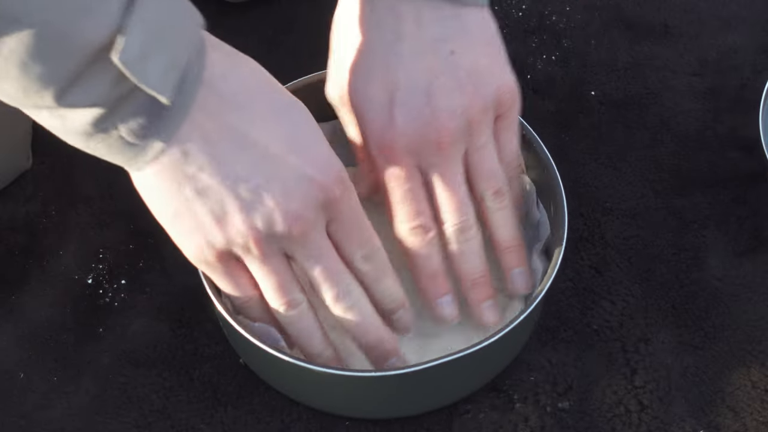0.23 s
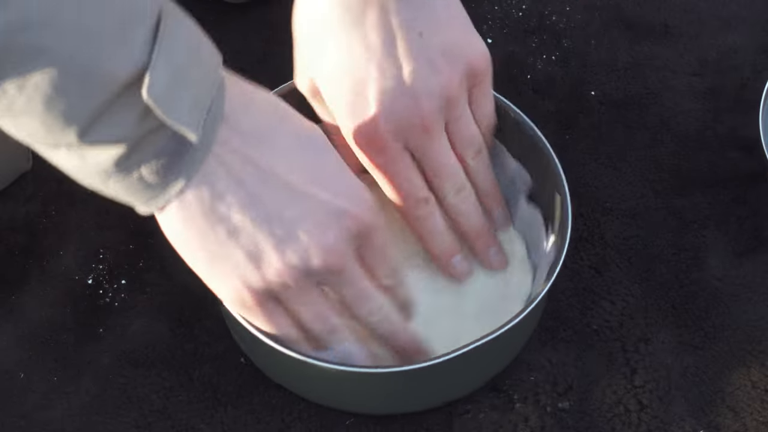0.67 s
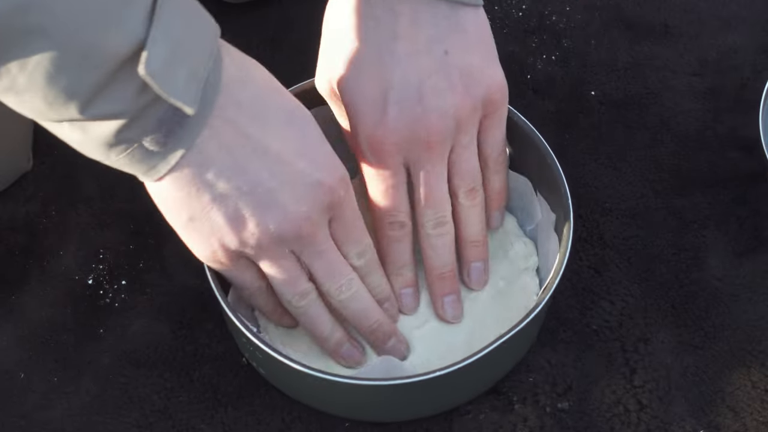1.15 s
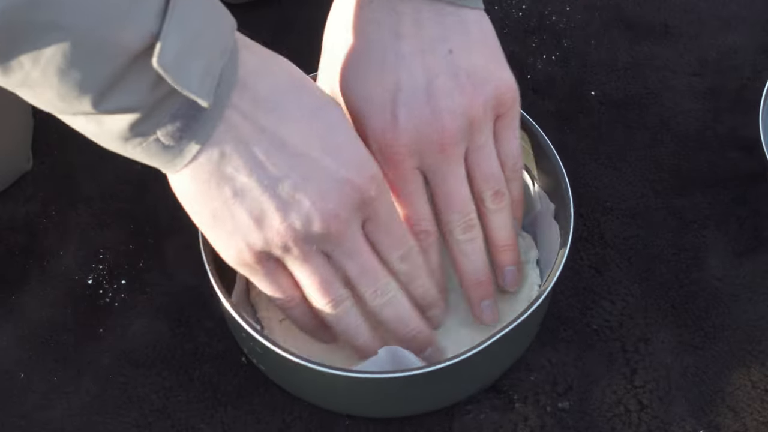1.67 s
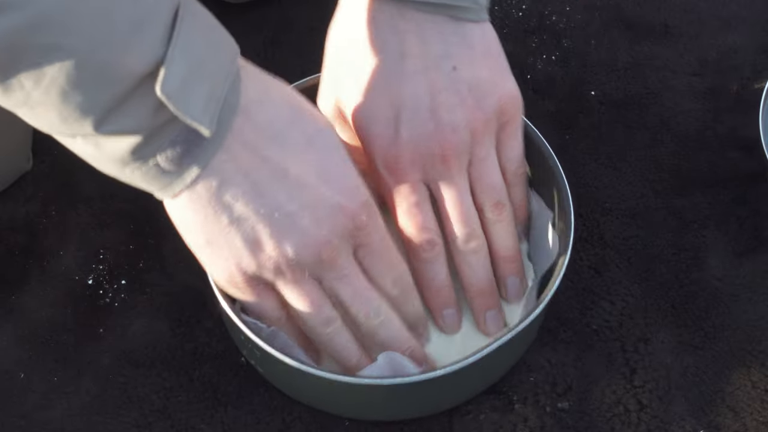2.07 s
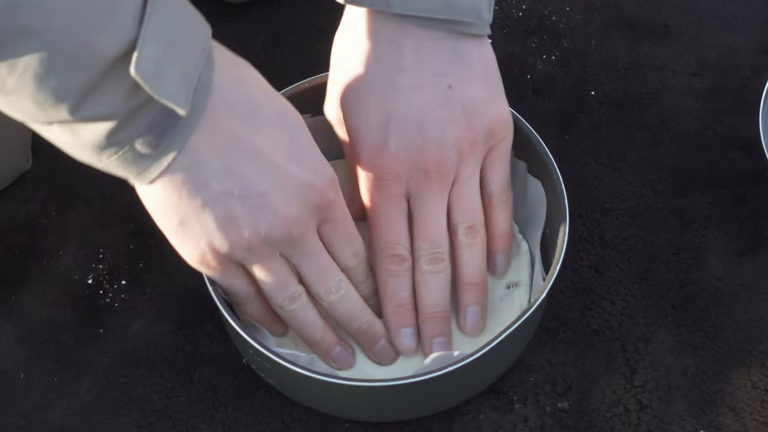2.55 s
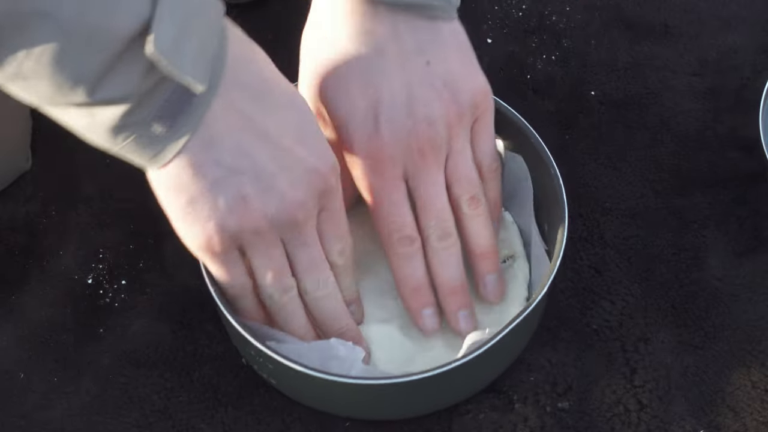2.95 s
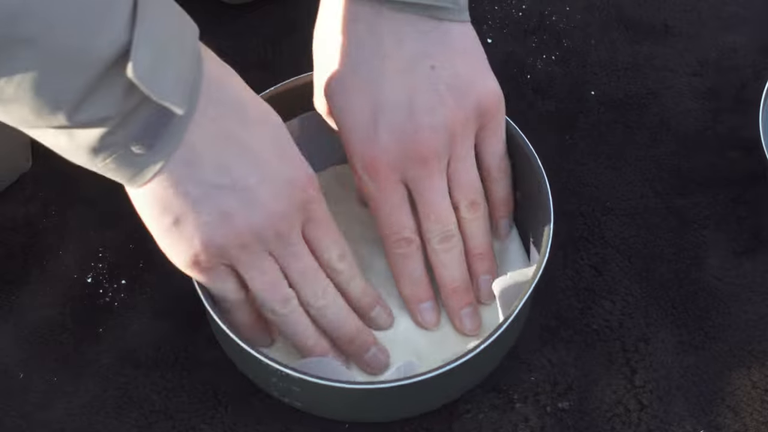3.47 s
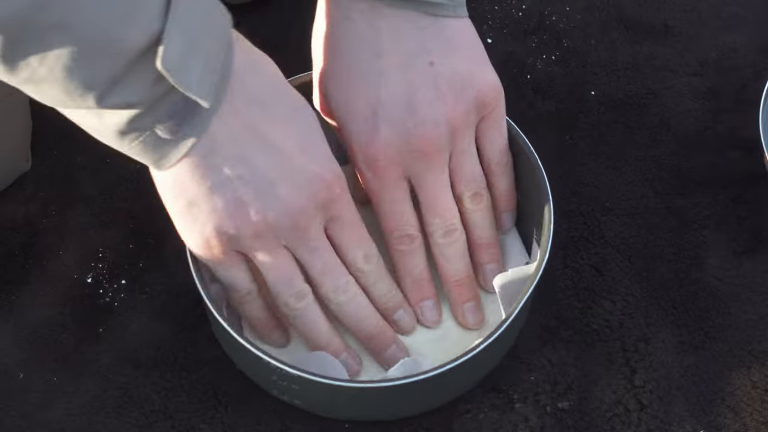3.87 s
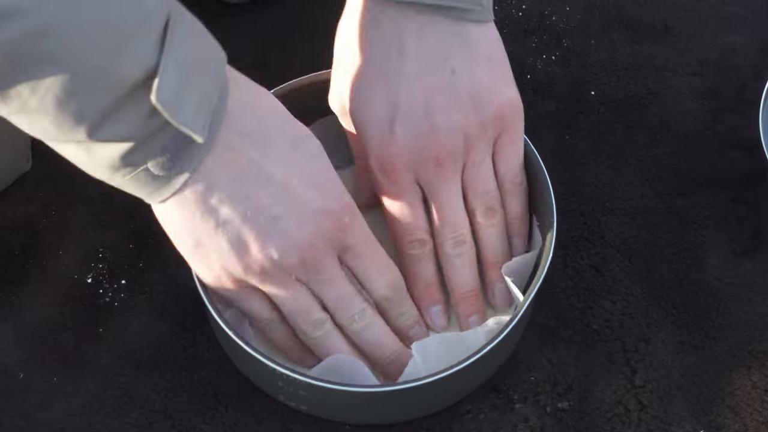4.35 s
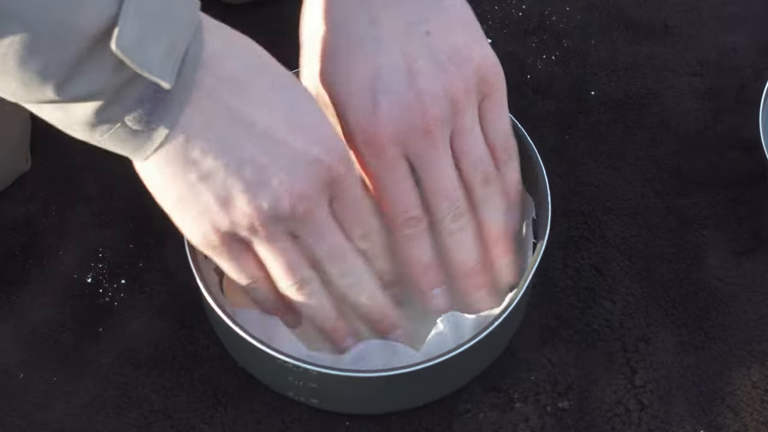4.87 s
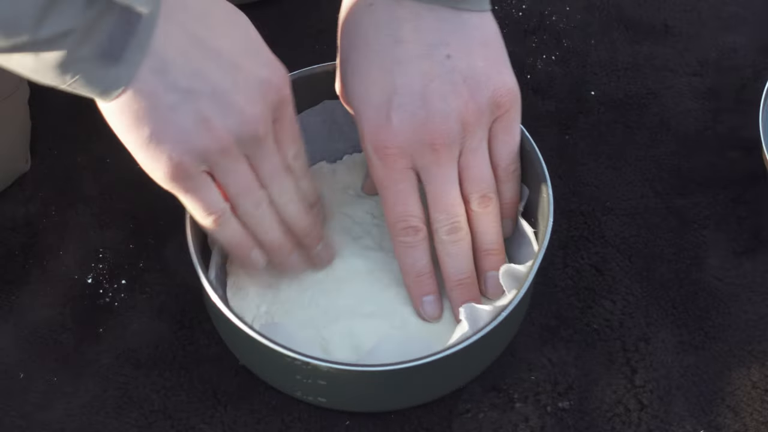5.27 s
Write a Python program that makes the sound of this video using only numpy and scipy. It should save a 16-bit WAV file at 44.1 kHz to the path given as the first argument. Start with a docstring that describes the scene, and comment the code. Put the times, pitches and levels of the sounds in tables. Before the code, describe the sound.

A close, dry outdoor sound of hands pressing dough into a metal tin lined with stiff baking paper. From the start, short rustling pushes follow one another with crisp crease snaps, a brighter, stronger swish at about 0.7 to 0.85 seconds. From 1 to 1.8 seconds it thins to softer rubs and scattered ticks, then a cluster of snaps comes near 1.9. At 2.2 a short damped tin knock stands out amid a bright slide; moderate rustling continues to 3. Between 3.3 and 3.6 the paper crackles sharply and brightly. It quietens around 3.7 to 4, with light tin knocks and a barely audible wavering tone near 3.85. Rustling builds again from 4.2, peaking at 4.9 to 5.3 in loud crinkling, fast cracks and a low soft thud at 5.04. A last few snaps come near 5.5. Faint, bassy still air persists throughout.

```python
"""Dough pressed into a paper-lined tin

Two hands press dough into a metal camping tin lined with baking paper, outdoors in a quiet wood.
Pushes drive stick-slip noise (paper on wall, fingers on paper) and wrinkle ticks; creases snap as
short resonant cracks. The hollow of the tin colours these. Folds scrape as gliding narrow-band
rings, the tin knocks in damped modes, the dough thuds in two low modes. Faint wavering tones with
a weak octave sound near 710 Hz. Still air rumbles faintly behind as coloured noise.
"""
import sys
import numpy as np
from scipy import signal
from scipy.fft import rfft, irfft, next_fast_len
from scipy.io import wavfile

SR = 44100
rng = np.random.default_rng(int(sys.argv[2]) if len(sys.argv) > 2 else 0)


def to_wav(s):
    """Save 16-bit WAV."""
    ch = np.atleast_2d(s).T  # columns
    pcm = np.round(np.clip(ch, -1, 1) * 32767)  # PCM
    wavfile.write(sys.argv[1], SR, pcm.astype(np.int16))


N = 243520

# still outdoor air, spectrum: f/Hz, relative density/dB
AIR_SPECTRUM = [(20, -1), (55, 1), (100, -4), (160, -4.5), (240, -12), (400, -11.5), (700, -13.5),
                (1400, -19.5), (3000, -21), (7000, -21), (9500, -20), (14500, -25), (16000, -39)]
AIR_RMS_DB = -43.5
# pushes sliding the paper: t of greatest speed/s, length/s, relative level/dB, brightness/dB
STROKES = [(0.084, 0.11, -37.5, -2.5), (0.313, 0.16, -36.5, 2), (0.489, 0.12, -36.5, -1.5),
           (0.565, 0.017, -35, 0), (0.718, 0.16, -26.5, 6), (0.835, 0.076, -32.5, 7),
           (1.054, 0.055, -41, -3.5), (1.31, 0.05, -51.5, -4), (1.454, 0.032, -35, 0.5),
           (1.754, 0.12, -44.5, -2.5), (1.889, 0.053, -39, 3), (2.19, .17, -32, 4), (2.31, .06, -36.5, 3),
           (2.479, 0.16, -42, 0.5), (2.669, 0.13, -35.5, 5), (2.81, 0.15, -37, -1.5),
           (2.981, 0.083, -32.5, 0.5), (3.049, 0.078, -37.5, 0.5), (3.15, 0.071, -33, -1.5),
           (3.324, 0.17, -30.5, 8), (3.447, 0.026, -33, 12), (3.508, 0.063, -32, 5), (3.614, 0.1, -42, 7),
           (3.718, 0.15, -42, 1), (4.066, 0.2, -40, -5.5), (4.162, 0.037, -34.5, 1.5),
           (4.286, 0.14, -36.5, 1), (4.396, 0.053, -31.5, -1.5), (4.538, 0.1, -31.5, 2.5),
           (4.642, 0.052, -31.5, 0), (4.803, 0.2, -38.5, -2), (4.907, 0.066, -26.5, 3),
           (4.985, 0.046, -23, 0.5), (5.086, 0.15, -30.5, -2), (5.157, 0.029, -28, 1.5),
           (5.243, 0.068, -27.5, -1.5), (5.45, 0.17, -38, 0.5), (5.515, 0.014, -28, 5)]
# share of a push spent gathering speed; a higher power flattens the top
SWELL_SHARE, SWELL_POWER, RELEASE_POWER = 0.56, 1.59, 2.2
# the paper never lies quite still under the hands
REST_REL_DB, REST_BRIGHTNESS_DB = -54.5, 3
# paper sliding on the wall, spectrum: f/Hz, relative density/dB
SLIDE_SPECTRUM = [(200, -19), (700, 0.5), (1400, -5), (2200, 1), (4000, 1.5), (6000, 1.5), (8500, -2),
                  (10000, -6), (13000, -8.5), (16000, -17)]
# fingertips dragging on dough-backed paper: t of greatest speed/s, length/s, relative level/dB
RUBS = [(0.258, 0.062, -42.5), (1.074, 0.084, -52.5), (1.315, 0.072, -52.5), (1.934, 0.1, -47.5),
        (2.73, 0.15, -48), (3.048, 0.058, -38), (3.215, 0.23, -46), (3.517, 0.034, -35),
        (3.89, 0.36, -48.5), (4.129, 0.15, -49), (4.534, 0.066, -48.5), (4.982, 0.22, -39),
        (5.05, 0.023, -28.5)]
# finger friction, spectrum: f/Hz, relative density/dB
RUB_SPECTRUM = [(100, 1), (300, -7.5), (600, -4), (900, 2), (1400, -3.5), (2500, -4), (5000, -5.5),
                (12000, -8)]
# every stroke drags the fingers too, at this gain on the stroke
STROKE_RUB_REL_DB = -25
# large creases buckling: t/s, relative level/dB, f/Hz, t60/s
LARGE_CREASES = [(0.0558, -16, 5430, 0.0092), (0.1481, -12.5, 5540, 0.0065), (0.339, -19, 3180, .024),
                 (0.447, -17, 4900, 0.014), (0.4631, -15.5, 4500, 0.013), (0.477, -14.5, 5600, .012),
                 (0.4916, -12, 4200, .012), (0.5378, -20.5, 8400, 0.0064), (0.6705, -13, 4930, 0.013),
                 (0.756, -13.5, 4360, .006), (0.8418, -15.5, 5240, 0.014), (0.8669, -17, 7460, .007),
                 (1.039, -28, 4500, .009), (1.447, -18.5, 3580, 0.012), (1.859, -14.5, 3390, .022),
                 (1.865, -15.5, 7100, 0.0082), (1.8849, -23, 5600, .009), (1.9259, -19, 4230, .009),
                 (1.9395, -14, 5800, 0.016), (2.3884, -23.5, 6460, 0.014), (3.0792, -25, 2795, .011),
                 (3.111, -17.5, 4000, 0.02), (3.2783, -15, 4800, 0.0083), (3.3293, -10, 8100, .01),
                 (3.403, -6.5, 5160, 0.011), (3.476, -17, 4270, 0.012), (3.4852, -14, 4170, .015),
                 (3.5062, -12.5, 6700, .004), (3.5159, -12.5, 4960, 0.024), (3.5302, -16, 4500, .009),
                 (3.6031, -21, 7300, .003), (3.645, -21.5, 4800, 0.016), (3.7067, -17, 2646, 0.014),
                 (4.053, -16.5, 5200, .008), (4.2349, -19.5, 5810, 0.0074), (4.2672, -12.5, 4900, 0.0089),
                 (4.3863, -14.5, 5850, 0.013), (4.434, -22, 4180, 0.01), (4.675, -9, 6430, .012),
                 (5.0425, -9, 3670, .003), (5.049, -8, 4130, 0.0072), (5.0617, -6, 5680, 0.018),
                 (5.145, -14, 5570, .012), (5.2895, -19.5, 4170, .01), (5.4673, -18, 6630, .015),
                 (5.5156, -13, 6470, 0.024)]
# small creases: rate and strength at mean stroke speed; exponents tie both to speed
SMALL_SNAPS_PER_S, SMALL_RATE_EXPONENT = 11, 0.7
SMALL_SNAP_REL_DB, SMALL_SNAP_SPREAD_DB, SMALL_STRENGTH_EXPONENT = -27.5, 2.5, 0.47
SMALL_SNAP_HZ, SMALL_SNAP_SPREAD_OCTAVES = 4920, 0.38
SMALL_SNAP_T60_S, SMALL_SNAP_T60_SPREAD_OCTAVES = 0.0086, 0.5
# resonances and notches of the hollow between tin and hands, then a lift near 8 kHz, a dip near 10 kHz and a
# bump near 12 kHz in the treble: f/Hz, width/Hz, level/dB
PAPER_COLOUR_BANDS = [(833, 170, 6), (1280, 330, 5.5), (1570, 120, -2.5), (1884, 335, 7), (2440, 320, 2.5),
                      (2906, 154, 5), (3620, 320, 1.5), (6460, 970, -3.5), (8200, 1900, 7), (9860, 2320, -8),
                      (12200, 2200, 4)]
# one fold or fingertip ringing: t/s, length/s, first f/Hz, last f/Hz, relative level/dB
SCRAPES = [(0.753, 0.0088, 4220, 4070, -21), (0.808, 0.018, 1844, 1710, -29), (0.857, .09, 476, 300, -53.5),
           (3.016, 0.05, 946, 883, -36.5), (3.239, 0.12, 1944, 1880, -37), (3.421, 0.046, 4560, 3380, -38),
           (3.76, .16, 1506, 1613, -47), (4.039, .2, 560, 380, -46), (4.499, 0.068, 751, 704, -41),
           (4.783, .16, 378.4, 475.5, -45.5), (5.136, 0.037, 2546, 2493, -29.5),
           (5.269, 0.037, 1096, 794, -41.5)]
# tin knocking on its board: t/s, relative level/dB
KNOCKS = [(0.882, -32.5), (1.295, -37.5), (2.2219, -16.5), (2.555, -32), (2.731, -33), (3.476, -34),
          (3.517, -32), (3.707, -23.5), (4.024, -28), (4.163, -26), (4.268, -26.5), (5.041, -27.5),
          (5.049, -26), (5.064, -29), (5.278, -23.5), (5.293, -32)]
# tin modes, damped by the dough: f/Hz, relative level/dB, t60/s
TIN_MODES = [(255, -39, 0.013), (399, -14, 0.044), (640, -19, 0.027), (860, 2, 0.012), (890, -8, 0.014),
             (1300, 2.5, 0.011), (1900, -6.5, 0.025)]
# hands pressing the dough: t/s, relative level/dB
THUDS = [(0.891, -34), (1.03, -32), (1.496, -34.5), (2.223, -43.5), (2.813, -38), (3.698, -36),
         (5.039, -16.5), (5.091, -35)]
# faint wavering tones: t loudest/s, length/s, f/Hz, relative level/dB
WAVERING_TONES = [(3.83, 0.073, 713, -47.5), (3.885, 0.05, 710, -36.5)]
CUTOFF_HZ = 16000


def from_db(db):
    """Decibels to gain."""
    return 10 ** (np.asarray(db) / 20)


def rms_one(x):
    """Scale to rms 1."""
    return x / np.sqrt(np.mean(x ** 2) + 1e-20)


def add(out, t_s, sound):
    """Mix a short sound in at t_s."""
    start = int(np.clip(round(t_s * SR), 0, N - 1))
    out[start:start + len(sound)] += sound[:N - start]


def coloured(x, spectrum):
    """Shape noise by a spectrum interpolated over log frequency; rms 1."""
    hz, db = np.transpose(spectrum)
    size = next_fast_len(N)
    bins_hz = np.maximum(np.fft.rfftfreq(size, 1 / SR), 1)
    gain = from_db(np.interp(np.log(bins_hz), np.log(hz), db))
    return rms_one(irfft(rfft(x, size) * gain, size)[:N])


def drift(rate_hz):
    """Random values at rate_hz joined by straight lines; spread about 1."""
    knots = rng.standard_normal(N // 20)
    walk = np.interp(np.arange(N) * rate_hz / SR, np.arange(len(knots)), knots)
    return walk * np.sqrt(3 / 2)   # makes up the spread lost between knots


def band(x, hz, q):
    """One resonance, gain 1 at its centre."""
    w = 2 * np.pi * np.clip(hz, 20, SR / 3) / SR
    damp = np.sin(w) / (2 * q)
    return signal.lfilter([damp, 0, -damp], [1 + damp, -2 * np.cos(w), 1 - damp], x)


def slips(per_s, spread_db):
    """Random stick-slip clicks of either sign: many small, a few larger."""
    sizes = from_db(spread_db * np.minimum(rng.exponential(1, N), 3.5))
    return (rng.random(N) < per_s / SR) * sizes * rng.choice([-1, 1], N)


def outdoor_air():
    """Still air is steady noise, strongest in the bass."""
    return from_db(AIR_RMS_DB) * coloured(rng.standard_normal(N), AIR_SPECTRUM)


def push_gain(peak_s, length_s, db):
    """A push swells to its peak, then stops a little faster."""
    t = np.arange(N) / SR - peak_s
    near = np.abs(t) < 3 * length_s
    t = t[near]
    swell = np.abs(t / (length_s * SWELL_SHARE)) ** SWELL_POWER
    release = np.abs(t / (length_s * (1 - SWELL_SHARE))) ** RELEASE_POWER
    gain = np.zeros(N)
    gain[near] = from_db(db) * np.exp(-np.where(t < 0, swell, release))
    return gain


def hand_motion():
    """Stroke gain and brightness/dB; where strokes overlap, the stronger dominates the brightness."""
    power = np.full(N, from_db(REST_REL_DB) ** 2)
    weighted_db = power * REST_BRIGHTNESS_DB
    for peak_s, length_s, db, brightness_db in STROKES:
        own = push_gain(peak_s, length_s, db) ** 2
        power = power + own
        weighted_db = weighted_db + own * brightness_db
    return np.sqrt(power), weighted_db / power


def fluttering(x, depth_db, rate_hz):
    """The sheet bends as it moves, so its bands swell and fade each on their own."""
    centres_hz = np.geomspace(700, 14000, 26)
    size = next_fast_len(N)
    bins_hz, spectrum = np.fft.rfftfreq(size, 1 / SR), rfft(x, size)
    total = np.zeros(N)
    for own in np.eye(len(centres_hz)):
        part = irfft(spectrum * np.interp(bins_hz, centres_hz, own), size)[:N]
        total += part * from_db(depth_db * drift(rate_hz))
    return rms_one(total)


def sliding_paper(stroke, brightness_db, slips_per_s, spread_db, judder_db, pivot_hz, level_db):
    """Stiff paper drags in thousands of tiny slips; a firm stroke packs them into a smooth hiss."""
    grain = coloured(slips(slips_per_s, spread_db), SLIDE_SPECTRUM)
    hiss = coloured(rng.standard_normal(N), SLIDE_SPECTRUM)
    firm = stroke / (stroke + np.mean(stroke))
    mixed = np.sqrt(1 - firm) * grain + np.sqrt(firm) * hiss
    friction = fluttering(mixed, depth_db=2.5, rate_hz=28)
    # free paper sounds bright, paper under a finger dull
    dull = signal.sosfiltfilt(signal.butter(2, pivot_hz, fs=SR, output="sos"), friction)
    tilt = from_db(brightness_db / 2)
    tilted = dull / tilt + (friction - dull) * tilt
    return tilted * stroke * from_db(level_db + judder_db * drift(160))


def crinkles(stroke, per_s, spread_db, q, follow, level_db):
    """Small wrinkles flip, each ringing at a pitch set by its size; `follow` ties level to stroke."""
    pitches_hz = np.geomspace(1800, 12000, 12)
    clicks = slips(per_s, spread_db)
    dealt = rng.integers(0, len(pitches_hz), N)
    rings = np.zeros(N)
    for k, hz in enumerate(pitches_hz):
        own = clicks * (dealt == k) + 1e-18   # offset avoids denormals
        rings += band(own, hz, q) / np.sqrt(hz)   # evens ring energy over pitch
    return rms_one(rings) * stroke ** follow * from_db(level_db)


def rubbing_fingers(stroke, slips_per_s, spread_db, judder_db, level_db):
    """Skin on paper backed by dough makes a duller, coarser friction."""
    grain = coloured(slips(slips_per_s, spread_db), RUB_SPECTRUM)
    power = (stroke * from_db(STROKE_RUB_REL_DB)) ** 2
    for rub in RUBS:
        power = power + push_gain(*rub) ** 2
    return grain * np.sqrt(power) * from_db(level_db + judder_db * drift(70))


def small_creases(stroke):
    """Chance snaps as LARGE_CREASES rows; a faster stroke makes them more frequent and stronger."""
    speed = stroke / np.mean(stroke)
    chance = SMALL_SNAPS_PER_S * speed ** SMALL_RATE_EXPONENT / SR
    born = np.flatnonzero(rng.random(N) < chance)
    strength, size, ring = rng.standard_normal((3, len(born)))
    db = SMALL_SNAP_REL_DB + SMALL_SNAP_SPREAD_DB * strength
    db = db + SMALL_STRENGTH_EXPONENT * 20 * np.log10(speed[born])
    hz = SMALL_SNAP_HZ * 2 ** (SMALL_SNAP_SPREAD_OCTAVES * size)
    t60_s = SMALL_SNAP_T60_S * 2 ** (SMALL_SNAP_T60_SPREAD_OCTAVES * ring)
    return list(zip(born / SR, db, hz, t60_s))


def snapping_creases(creases, crack, q, rise_s, facet_share, facet_octaves, low_hz, level_db):
    """A crease gives way with a crack, and the facets around it flutter for a few milliseconds."""
    out, t = np.zeros(N), np.arange(SR // 20) / SR
    # a small facet radiates little bass
    no_bass = signal.butter(2, low_hz, "high", fs=SR, output="sos")
    for t_s, db, hz, t60_s in creases:
        facets = 2 ** (facet_octaves * rng.uniform(-1.07, 1, 3))
        flutter = rng.standard_normal(len(t))
        force = flutter * np.minimum(t / rise_s, 1) ** 2 * from_db(-60 * t / t60_s)
        force[int(rise_s * SR)] += crack
        rings = sum(band(force, hz * size, 14) for size in facets)
        snap = signal.sosfilt(no_bass, band(force, hz, q) + facet_share * rings)
        # level sets the energy of the whole snap
        add(out, t_s - rise_s / 2, snap / np.linalg.norm(snap) * from_db(db + level_db))
    return out


def hollow(x):
    """The space between tin and hands lifts some bands and cancels others; the treble is also lifted near 8
    kHz, cut near 10 kHz and lifted near 12 kHz."""
    for hz, width_hz, db in PAPER_COLOUR_BANDS:
        lift = from_db(db / 2)
        damp = np.pi * width_hz / SR
        turn = -2 * np.cos(2 * np.pi * hz / SR)
        zeros = [1 + damp * lift, turn, 1 - damp * lift]
        poles = [1 + damp / lift, turn, 1 - damp / lift]
        x = signal.lfilter(zeros, poles, x)
    return x


def ringing_scrapes(damping_hz, width_share, level_db):
    """Friction feeds one resonance, whose pitch glides as the free length of the fold changes."""
    out = np.zeros(N)
    for t_s, length_s, first_hz, last_hz, db in SCRAPES:
        count = int(length_s * SR)
        # the dough damps every ring, widening its band
        narrow = signal.butter(2, damping_hz + first_hz * width_share, fs=SR, output="sos")
        a, b = signal.sosfilt(narrow, rng.standard_normal((2, SR // 2)))[:, -count:]
        phase = 2 * np.pi * np.cumsum(np.linspace(first_hz, last_hz, count)) / SR
        ring = rms_one(a * np.cos(phase) + b * np.sin(phase))
        add(out, t_s, ring * np.sqrt(np.hanning(count)) * from_db(db + level_db))
    return out


def knocking_tin(variety_db, contact_db, contact_t60_s, level_db):
    """A short hard contact strikes the tin's modes, with fresh mode strengths at each knock."""
    out, t = np.zeros(N), np.arange(SR // 8) / SR
    for t_s, db in KNOCKS:
        modes = np.zeros(len(t))
        for hz, mode_db, t60_s in TIN_MODES:
            own_db = mode_db + variety_db * rng.normal()
            modes += np.sin(2 * np.pi * hz * t) * from_db(own_db - 60 * t / t60_s)
        contact = band(rng.standard_normal(len(t)), 1000, 0.27)
        contact = contact * from_db(contact_db - 60 * t / contact_t60_s)
        add(out, t_s, (modes + contact) * from_db(db + level_db))
    return out


def dough_thuds(push_s, low_hz, high_hz, q, level_db):
    """A push on the dough is a soft pulse that shakes tin and board in two low, dead modes."""
    out, t = np.zeros(N), np.arange(SR // 6) / SR
    push = t / push_s * np.exp(-t / push_s)
    thud = band(push, low_hz, q) + band(push, high_hz, q)
    for t_s, db in THUDS:
        add(out, t_s, thud / np.abs(thud).max() * from_db(db + level_db))
    return out


def wavering_tone(jitter, overtone_db, judder_db):
    """Faint tones of randomly wavering pitch and level, each a sine with a weak octave."""
    out = np.zeros(N)
    for peak_s, length_s, hz, db in WAVERING_TONES:
        phase = 2 * np.pi * np.cumsum(hz * (1 + jitter * drift(200))) / SR
        tone = rms_one(np.sin(phase) + from_db(overtone_db) * np.sin(2 * phase))
        # same swell and release shape as a push
        out += tone * push_gain(peak_s, length_s, db) * from_db(judder_db * drift(90))
    return out


def scene():
    """Friction, crinkles and snaps pass through the hollow; all other layers bypass it."""
    air = outdoor_air()
    stroke, brightness_db = hand_motion()
    slide = sliding_paper(stroke, brightness_db, slips_per_s=4000, spread_db=1.5, judder_db=2.5,
                          pivot_hz=4800, level_db=-0.5)
    wrinkles = crinkles(stroke, per_s=260, spread_db=2.5, q=9.3, follow=1, level_db=-9.5)
    # stray wrinkles keep ticking as the paper relaxes between strokes
    stray = crinkles(stroke, per_s=27, spread_db=4.5, q=3.0, follow=0.48, level_db=-36)
    rub = rubbing_fingers(stroke, slips_per_s=3600, spread_db=3.0, judder_db=5, level_db=1)
    creases = list(LARGE_CREASES) + small_creases(stroke)
    snaps = snapping_creases(creases, crack=2.14, q=0.86, rise_s=0.00068, facet_share=1.0,
                             facet_octaves=0.69, low_hz=850, level_db=14.5)
    paper = hollow(slide + wrinkles + stray + rub + snaps)
    scrapes = ringing_scrapes(damping_hz=70.4, width_share=0.04, level_db=0.5)
    knocks = knocking_tin(variety_db=3, contact_db=4, contact_t60_s=0.0073, level_db=-2.0)
    thuds = dough_thuds(push_s=0.00037, low_hz=87, high_hz=300, q=1.06, level_db=2.5)
    tones = wavering_tone(jitter=0.0315, overtone_db=-10, judder_db=0.5)
    return (air + paper + scrapes + knocks + thuds + tones)[None]


def record(dry):
    """Clip at full scale, then low-pass steeply."""
    low_pass = signal.ellip(14, 0.1, 95, CUTOFF_HZ, fs=SR, output="sos")
    return signal.sosfilt(low_pass, np.clip(dry, -1, 1))


dry = scene()
out = record(dry)
to_wav(out)
```